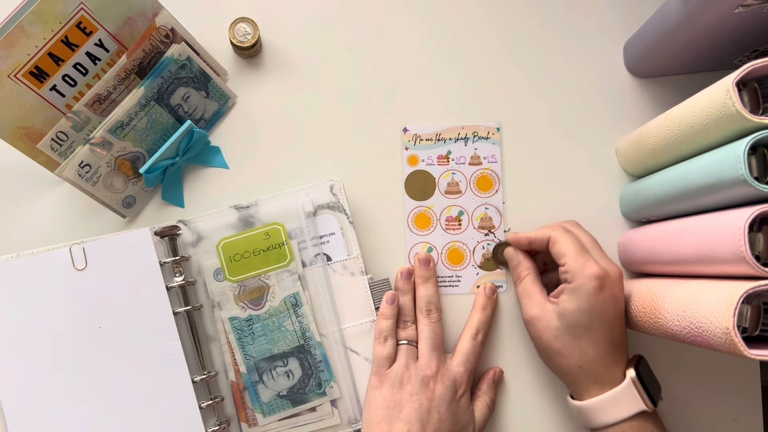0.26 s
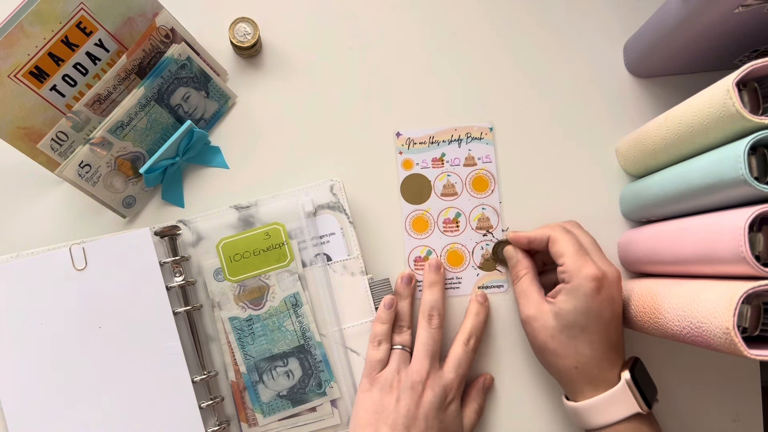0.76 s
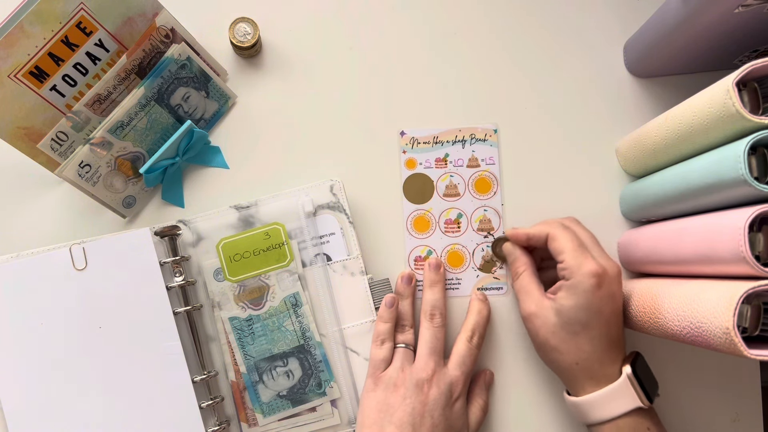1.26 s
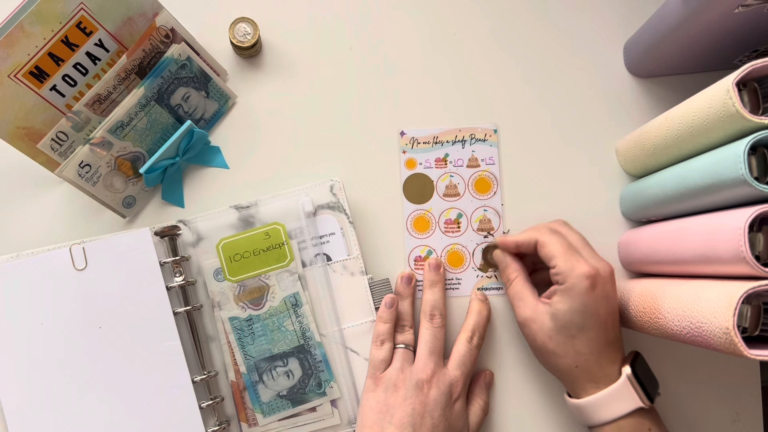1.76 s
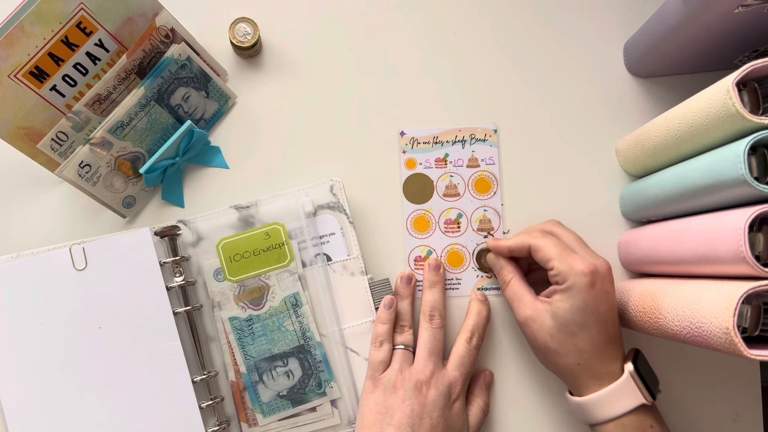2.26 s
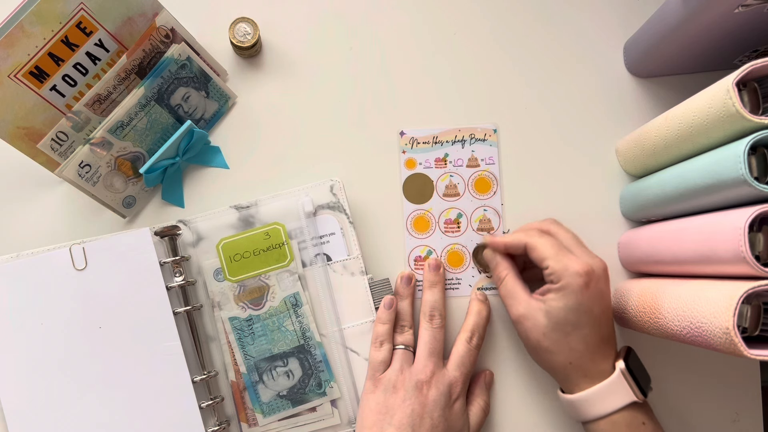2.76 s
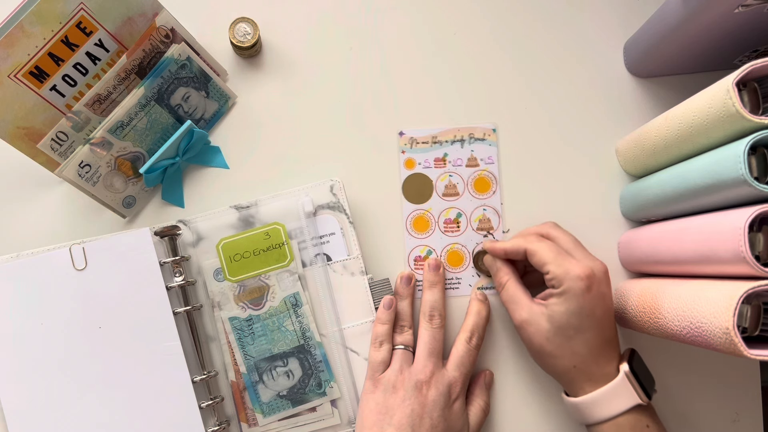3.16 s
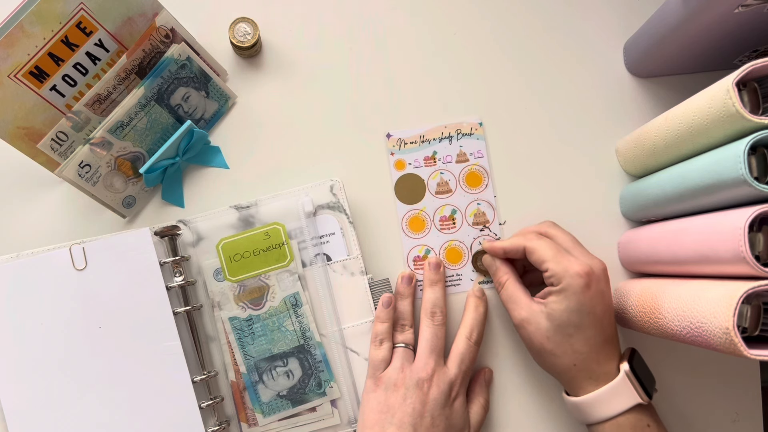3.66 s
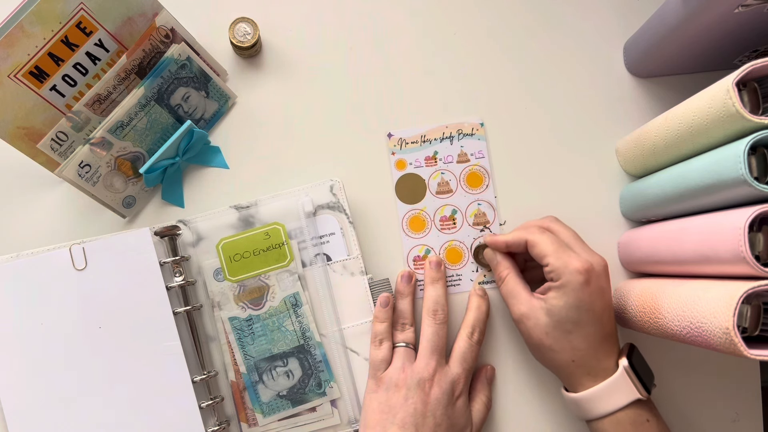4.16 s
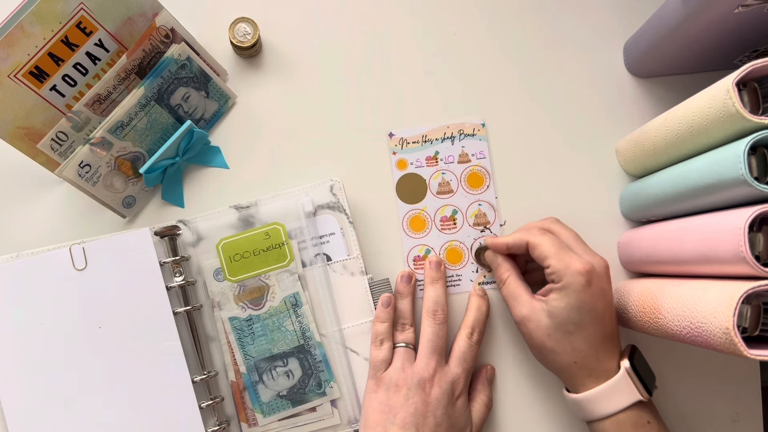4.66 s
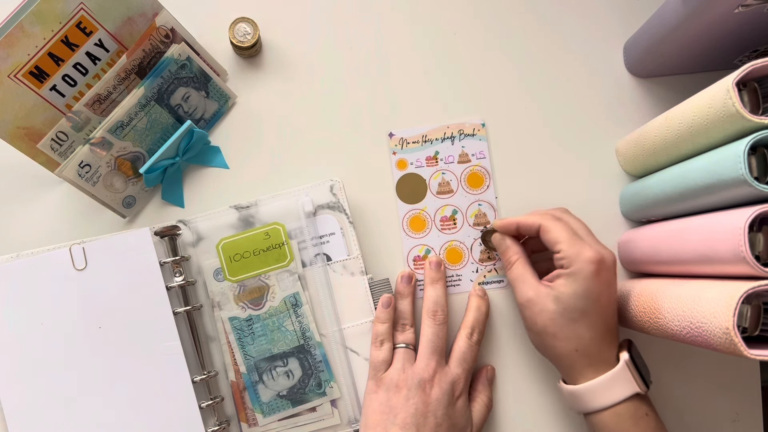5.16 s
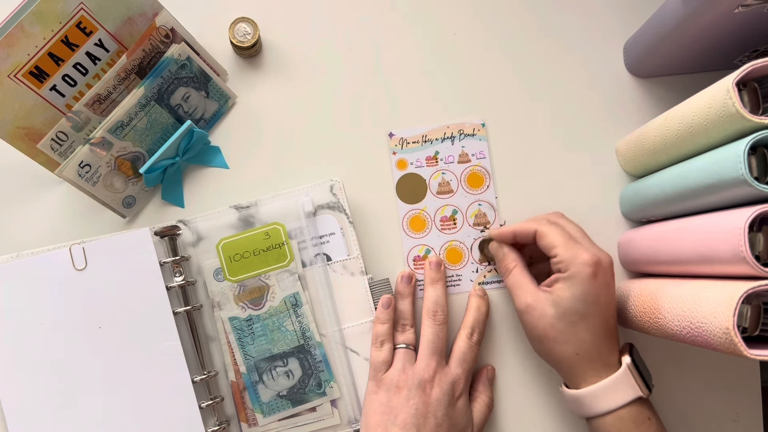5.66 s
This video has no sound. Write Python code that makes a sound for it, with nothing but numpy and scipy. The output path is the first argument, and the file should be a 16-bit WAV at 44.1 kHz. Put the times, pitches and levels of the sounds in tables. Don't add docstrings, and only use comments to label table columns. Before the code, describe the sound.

Rapid dry scratching of a coin on a coated card, steady at first, then uneven flicks and a few drumming corner sweeps.

```python
import sys
import numpy as np
from scipy import signal
from scipy.fft import rfft, irfft, next_fast_len
from scipy.io import wavfile
from scipy.ndimage import uniform_filter1d, map_coordinates

SR = 44100
rng = np.random.default_rng(int(sys.argv[2]) if len(sys.argv) > 2 else 0)


def digitize_waveform(pressure):
    field = np.atleast_2d(pressure).T
    bounded = np.clip(field, -1, 1)
    quanta = np.round(bounded * 32767).astype(np.int16)
    wavfile.write(sys.argv[1], SR, quanta)


def invert_db(level):
    return 10 ** (np.asarray(level, dtype=float) / 20)


N = 260983
TIME = np.arange(N) / SR


def unit(x):
    return x / np.sqrt(np.mean(x ** 2) + 1e-20)


def along(points, hz):
    f, v = np.transpose(points)
    return np.interp(np.log(hz + 1), np.log(f + 1), v)


def filtered(x, response):
    m = next_fast_len(N + SR // 2)
    return irfft(rfft(x, m) * response(np.fft.rfftfreq(m, 1 / SR)), m)[..., :N]


def mode(f, hz, width_hz):
    return 1j * f * width_hz / (hz * hz - f * f + 1j * f * width_hz)


def desk(f):
    # (frequency [Hz], width [Hz], signed gain left [1], signed gain right [1])
    desk_modes = [(402.1, 50.6, -2, -2), (419.6, 70, 1.4049, 1.62), (620, 131.6, 2, -0.09),
                  (670.5, 268, -1.5065, 0.5442), (775, 154.5, 0.05, -0.9), (894, 124, 0.6064, -0.1833),
                  (1099.6, 44.2, 1.14, 0.28), (1175, 59.7, 0.46, 0.66), (1454, 217, 0.46, -0.51),
                  (1442, 82, -0.72, 0.86), (1602, 166.7, -1.0865, -1.3043), (1631.3, 217, 0.4542, 1.0779),
                  (2185.6, 233, 0.07, 0.8066), (2204, 287, 0.1253, -0.6584), (2470, 230, -0.07, 0.0621),
                  (2710, 650, 0.0332, -0.0451)]
    modes = 0
    for hz, width_hz, left, right in desk_modes:
        modes = modes + np.array([[left], [right]]) * mode(f, hz, width_hz)
    return modes * f * f / (f * f - 385 ** 2 - 1j * f * 330)


def air(colour):
    # (frequency [Hz], lead [rad])
    lead_points = [(1500, 0), (2400, .8), (3300, .2), (5000, .3), (6100, -1.2), (6800, .3), (8100, -.1),
                   (9400, -3.1), (9900, -3.4), (11200, -6.3), (12300, -6.7), (12700, -9.1), (13800, -9.6),
                   (14600, -12.5)]

    def response(f):
        half_lead = np.interp(f, *np.transpose(lead_points)) / 2
        return invert_db(along(colour, f)) * np.exp(1j * np.array([half_lead, -half_lead]))

    return response


def all_strokes():
    # (top speed time [s], half length [ms], rub [dB], hiss re rub [dB], fizz re rub [dB])
    scrub = [(.047, 12.6, -50.5, -15.5, -50), (.156, 18.7, -46, -25, -61), (.245, 11.5, -60.5, -11.5, -20),
             (.345, 16.4, -46, -18.5, -36), (.446, 9.6, -50, -17, -52), (.527, 18.6, -53.5, -29, -55),
             (.618, 14, -69.5, -28, -8.5), (.668, 31.4, -59.5, -31, -13), (.818, 11.5, -46, -27.5, -34),
             (.941, 13.7, -47, -12.5, -69), (1.076, 20, -41, -28, -31), (1.19, 20, -52.5, -6, -22),
             (1.311, 20.6, -44.5, -26.5, -22), (1.42, 16, -50.5, -6.5, -19), (1.531, 20.4, -44.5, -24, -21),
             (1.635, 17.4, -48.5, -16.5, -16.5), (1.75, 21.1, -43, -25.5, -28),
             (1.873, 12.8, -46, -13, -33), (1.982, 20.3, -45.5, -25, -25.5), (2.098, 15.6, -51.5, -10, -24),
             (2.222, 16.9, -42, -28.5, -31.5), (2.331, 9, -42.5, -28.5, -36),
             (2.426, 16.2, -43, -24.5, -22.5)]
    # (top speed time [s], half length [ms], rub [dB], hiss re rub [dB],
    # fizz re rub [dB])
    flicks = [(2.52, 16.6, -62.5, -16, -20), (2.628, 19.2, -46, -40, -25.5), (2.737, 16, -59.5, -8, -12.5),
              (2.842, 21, -53, -35, -24), (2.944, 8.1, -51.5, -17.5, -27), (3.074, 24.4, -56.5, -17.5, -29),
              (3.145, 9.6, -51.5, -21.5, -26), (3.264, 19, -61.5, -28, -24), (3.366, 16, -55, -20, -20.5),
              (3.492, 12.3, -58, -37, -25), (3.583, 13.6, -77.5, 3.5, -17), (3.686, 4, -81.5, -7, -16.5),
              (3.93, 18, -65.5, -19, -47), (4.091, 30, -63.5, -40, -45), (4.148, 14.5, -50.5, -19.5, -46),
              (4.272, 15.7, -45.5, -44.5, -56), (4.373, 14, -58.5, -31.5, -31),
              (4.487, 16, -50.5, -35, -44.5), (4.553, 8.1, -48.5, -27.5, -38), (4.688, 33, -54, -44, -47),
              (4.734, 29, -66, -6, -18), (4.798, 17.5, -55, -49.5, -32), (4.872, 3.9, -62, -41, -24),
              (4.924, 15, -91.5, -5, 6)]
    # (top speed time [s], half length [ms], rub [dB], hiss re rub [dB], fizz re rub [dB])
    sweeps = [
        (5.221, 7.5, -62, -43, -22),
        (5.284, 19, -49.5, -41.5, -23.5),
        (5.444, 11, -88, 3, 5.5),
        (5.525, 18.7, -49.5, -24.5, -52),
        (5.57, 17, -96.5, 18, 26),
        (5.822, 34, -51.5, -21.5, -27),
    ]
    kinds = ((scrub, 0.035), (flicks, 0.35), (sweeps, 0.34))
    return [(*row, lean) for rows, lean in kinds for row in rows]


def bells():
    power = np.zeros((4, N))
    sharpness = np.array([[0.8], [1.2], [1.1], [1.1]])
    for s, half_ms, rub_db, hiss_db, fizz_db, lean in all_strokes():
        near = slice(max(round((s - 0.25) * SR), 0), round((s + 0.25) * SR))
        t = TIME[near] - s
        half_s = half_ms / 1000 * (1 + lean * np.sign(t))
        bell = np.exp(-0.5 * np.abs(t / half_s) ** 2.57)
        level_db = rub_db + np.array([[0], [0], [hiss_db], [fizz_db]])
        power[:, near] += bell ** sharpness * invert_db(2 * level_db)
    return power


def grit(rate_hz, spread_db, smooth):
    bunch = map_coordinates(rng.standard_normal(N // 128 + 4), [np.arange(N) / 128])
    sizes = invert_db(spread_db * np.minimum(rng.exponential(size=N), 2.5))
    slips = (rng.random(N) < rate_hz / SR) * rng.standard_normal(N) * sizes
    return unit(slips) * invert_db(2.2 * bunch) + smooth * rng.standard_normal(N)


def patchy(x, patchy_db):
    z = signal.stft(x, nperseg=256)[2]
    field = uniform_filter1d(rng.standard_normal(z.shape), size=3, axis=-2)
    field = uniform_filter1d(field, size=7, axis=-1)
    return signal.istft(z * invert_db(patchy_db * unit(field)), nperseg=256)[1][..., :N]


def strokes():
    # (time [s], upper over lower hiss [dB])
    coating = [(0, -2.5), (.45, -2.5), (.56, -14), (.7, -2.5), (2.1, -3), (2.38, -8), (2.8, -4.5),
               (3.5, -11), (4.3, -15.5), (4.75, -7.5), (4.9, -3), (5.92, -2.5)]
    # (frequency [Hz], density [dB per Hz])
    scuff_colour = [(1500, -25.5), (2500, 2), (3300, 3), (4100, 2), (5000, -7.5), (6200, -23),
                    (7000, -41.5)]
    hiss_colour = [(4600, -28), (5300, -7.5), (6100, 7.5), (6800, -1.5), (7600, -1.5), (9200, -19.5),
                   (9900, -59.5)]
    fizz_colour = [(9000, 1), (9800, 5), (10500, 4), (12000, -5), (12800, -10.5), (14500, 1.5), (15700, -3),
                   (16000, -32)]
    dull, sharp, hiss, fizz = np.sqrt(bells())

    s, _, _, hiss_db, *_ = np.transpose(all_strokes())
    steep_db = 6.5 + 0.7 * hiss_db - 0.46 * np.interp(s, *np.transpose(coating))
    bite_db = np.interp(TIME, s, np.clip(steep_db, -31, 1.5))
    upper_db = np.interp(TIME, *np.transpose(coating))

    coarse = grit(1600, 3, smooth=0.5)
    fine = grit(2000, 3.5, smooth=0.5)
    push = filtered(patchy(coarse, 2.4), lambda f: (1 - 0.27 * mode(f, 408, 120)) / (1 + 1j * f / 900) ** 3)
    bite = filtered(patchy(fine, 2.2), lambda f: (1j * f / (900 + 1j * f)) ** 2)
    push = push / np.std(filtered(push, desk))
    bite = bite / np.std(filtered(bite, desk))
    dull_force = dull * invert_db(-3.5 - 0.17 * bite_db) * push
    sharp_force = sharp * invert_db(3.5 + 0.96 * bite_db) * bite
    body = filtered(dull_force + sharp_force, desk)

    tear = patchy(grit(3000, 2.8, smooth=0.76), 3.3)
    scuff = unit(filtered(tear, air(scuff_colour)))
    upper = unit(filtered(tear, air(hiss_colour)))
    top = unit(filtered(tear, air(fizz_colour)))
    torn = hiss * (invert_db(-5.0 - 0.61 * upper_db) * scuff + invert_db(-2.3 + 1.8 * upper_db) * upper)
    return body, torn + fizz * invert_db(1.0) * top


def contacts():
    # (time [s], peak [dB], click re peak [dB], contact [ms])
    catches = [(.615, -22.5, -40, 0.87), (.894, -33, -40, 0.98), (.927, -44, -38, 1),
               (1.105, -26, -25, 0.78), (1.173, -30, -29, 0.057), (1.271, -22, -39, 0.88),
               (1.552, -15.5, -33, 1), (1.615, -30.5, -30, 0.36), (1.834, -44.5, -8, 0.32),
               (2.201, -20.5, -40, .99), (2.639, -19, -25.5, 0.37), (2.73, -24, -24, 0.24),
               (2.824, -41, -20.5, 0.78), (2.864, -17.5, -32.5, 0.78), (2.94, -32.5, -38, 0.35),
               (3.027, -38, -44, .95), (3.364, -26.5, -24, 0.17), (3.568, -38, -17.5, 1),
               (3.599, -26, -35, 1), (3.932, -29, -33, 0.56), (4.132, -25.5, -44, 0.51),
               (4.303, -17.5, -37.5, 0.42), (4.411, -40.5, -35, .16), (4.487, -16, -35, 0.67),
               (4.556, -32.5, -33, 0.097), (4.665, -18.5, -34.5, 0.59), (4.721, -29.5, -22.5, 0.7),
               (4.762, -49, -8, .54), (5.277, -26.5, -21.5, 0.62), (5.552, -20.5, -12, 0.41)]
    # (time [s], peak [dB], click re peak [dB], contact [ms], card spring [dB])
    landings = [(.131, -27, -27, .99, 7), (.692, -38.5, -16.5, 0.63, 3), (1.201, -19.5, -25, 0.38, 7.5),
                (2.628, -19, -28.5, 0.95, 5), (3.066, -11.5, -32, 0.55, 7.5),
                (3.143, -21, -38.5, 0.15, 6.5), (3.353, -45.5, -17.5, .15, 11),
                (3.684, -63, -11.5, .4, 6.5), (3.939, -26, -40, 1, 3.5), (4.049, -29.5, -34, 0.36, 12),
                (4.166, -32, -18.5, 0.096, -0.5), (5.215, -37, -21, 1, 7), (5.507, -12.5, -25, 0.28, 11),
                (5.781, -13, -23.5, 0.22, 14.5)]
    flat_card_db = -12
    rows = sorted([(*row, flat_card_db) for row in catches] + landings)
    return [(*row, -19.5 - 18.5 * row[3]) for row in rows]


def taps():
    # (frequency [Hz], density [dB per Hz])
    click_colour = [(2000, -48.5), (3200, -4), (5000, -13), (7500, -11), (9000, -13.5), (11000, -15),
                    (13000, -14.5), (15500, -13.5), (16000, -35.5)]
    force, spring, crack = np.zeros((3, N + SR))
    t = np.arange(SR // 40) / SR
    hits = contacts()
    noises = rng.standard_normal((len(hits), 2, len(t)))
    for (s, db, click_db, contact_ms, card_db, skid_db), (skid_noise, crack_noise) in zip(hits, noises):
        here = slice(round(s * SR), round(s * SR) + len(t))
        u = t / (max(contact_ms, 0.05) / 4000)
        push = u * np.exp(-u) / np.sum(u * np.exp(-u))
        skid = invert_db(skid_db - 60 * t / 0.032) * skid_noise
        force[here] += invert_db(db + 29) * (push + skid)
        spring[here] += invert_db(db + 17.5 + card_db) * push
        dull = np.clip(-0.02 * (click_db + 8.5), 0, 0.8)
        dulled = signal.lfilter([1 - dull], [1, -dull], crack_noise)
        crack[here] += invert_db(db + click_db + 6.0 - 60 * t / 0.028) * dulled
    knock = filtered(force[:N], lambda f: desk(f) * (1 - 0.22 * mode(f, 407, 120)))
    knock = knock + filtered(spring[:N], lambda f: desk(f) * mode(f, 647, 180))
    return knock, filtered(crack[:N], air(click_colour))


def corner(x):
    late = TIME > 5.1

    def drum(f):
        low = -0.23 * mode(f, 376, 182) + 0.45 * mode(f, 610, 300)
        high = -0.5 * mode(f, 1520, 710) + 0.35 * mode(f, 2500, 400)
        return 1 + low + high

    return x * ~late + filtered(x * late, drum)


def thumps():
    # (time [s], peak [dB], frequency [Hz], t60 [s])
    drops = [(0.148, -42, 120.7, 0.23), (0.698, -36.5, 118, 0.19), (1.108, -56, 131, 0.12),
             (1.556, -41, 138.5, 0.28), (2.205, -38.5, 139, 0.1), (2.447, -55, 118, 0.39),
             (2.646, -31, 127.6, 0.17), (2.736, -31, 130, 0.14), (2.865, -42.5, 133.6, 0.41),
             (3.068, -46, 130.3, 0.34), (3.37, -39.5, 119, 0.22), (4.144, -33.5, 121, 0.12),
             (4.308, -60, 174, 0.19), (4.49, -47, 131, 0.51), (4.7, -49, 127, 0.54),
             (5.513, -47, 118, 0.41), (5.783, -51.5, 181, 0.18), (.38, -49, 58.4, .3), (.64, -51.5, 56, .3),
             (1.21, -48, 60.4, 0.41), (2.21, -43.5, 58, 0.28), (3.231, -45, 128, 0.23),
             (3.6, -53.5, 136, 0.13), (3.93, -52, 128, 0.14), (4.049, -47, 130, 0.26),
             (4.666, -43, 141, 0.16), (5.041, -56, 68.8, 0.34)]
    out = np.zeros(N + SR)
    t = np.arange(SR // 2) / SR
    for s, db, hz, t60_s in drops:
        ring = invert_db(db - 60 * t / t60_s) * np.sin(2 * np.pi * hz * t)
        out[round(s * SR):][:len(t)] += ring * (1 - np.exp(-t / 0.017))
    return out[:N]


def arm():
    # (frequency [Hz], width [Hz], gain [dB])
    boom_modes = [(118, 2.6, -3), (131.2, 25, -3), (177, 16, -6.5), (259, 79, -11.5)]
    # (frequency [Hz], width [Hz], gain [dB])
    sway_modes = [(50, 10, -0.5), (59, 15, 1.5), (72, 3.5, -8)]
    # (time [s], weight [dB])
    weight = [(0.0, -45), (0.05, -63.5), (0.23, -57.5), (0.3, -68), (0.43, -59.5), (0.64, -69.5),
              (1.35, -56), (1.38, -63), (2.29, -63.5), (2.31, -74), (2.47, -54), (3.21, -54), (3.23, -63),
              (4.14, -63), (4.19, -55), (4.25, -57.5), (5.62, -73.5), (5.92, -66)]
    settle_s, rest_db, knock_share_db = 0.03, -91.5, -24.5
    weight_db = np.interp(TIME, *np.transpose(weight))
    keep = np.exp(-1 / (settle_s * SR))
    effort = bells()[0]
    for s, db, *_ in contacts():
        effort[round(s * SR)] += invert_db(2 * (db + knock_share_db)) * settle_s * SR
    effort_db = 10 * np.log10(signal.lfilter([1 - keep], [1, -keep], effort) + invert_db(2 * rest_db))
    boom_db = -59 + 0.69 * (effort_db + 48.5) + 0.45 * (weight_db + 60.5)

    def shaken(db, modes, apart):
        def shape(f):
            ringing = sum(invert_db(gain_db) * mode(f, hz, width_hz) for hz, width_hz, gain_db in modes)
            return ringing * mode(f, modes[1][0], 94) * (f / (f + 1j * 45)) ** 2

        mid, side = unit(filtered(rng.standard_normal((2, N)), shape))
        return invert_db(db) * np.array([mid + apart * side, mid - apart * side])

    out = shaken(boom_db, boom_modes, apart=0.3) + shaken(weight_db - 0.6, sway_modes, apart=0.07)
    return out * invert_db([[-0.4], [0.4]])


def room(x, apart):
    # (frequency [Hz], t60 [s])
    decay = [(200, 0.73), (600, 0.18), (1600, 0.3), (2400, 0.33), (4000, 0.27), (10000, 0.093)]
    hz, t, z = signal.stft(rng.standard_normal((2, SR // 2)), SR, nperseg=256)
    fade = invert_db(-60 * t / along(decay, hz)[:, None])
    mid, side = signal.istft(z * fade, SR, nperseg=256)[1]
    tail = np.array([mid + apart * side, mid - apart * side])
    delayed = np.pad(x, ((0, 0), (250, 0)))
    return signal.fftconvolve(delayed, tail / np.linalg.norm(tail[0]), axes=1)[:, :N]


def whistle():
    hz, sag_hz_per_s, fuzz_hz, half_s = 3990, 700, 90, 0.06
    t = TIME - 3.78
    fuzz = unit(filtered(rng.standard_normal(N), lambda f: 1 / (1 + (f / fuzz_hz) ** 2)))
    turns = hz * t - sag_hz_per_s * t * t / 2
    swell = invert_db(-93) * np.exp(-0.5 * (t / half_s) ** 2)
    return swell * (1 + fuzz) * np.sin(2 * np.pi * turns)


def hush():
    # (frequency [Hz], density [dB per Hz])
    floor = [(120, -26), (200, 3.5), (620, -6.5), (950, -12), (1500, -13.5), (2400, -18.5), (4000, -22.5),
             (6200, -24.5), (9000, -25), (12500, -27), (14000, -38), (16000, -52.5)]
    shared = unit(filtered(rng.standard_normal(N), air(floor)))
    own = unit(filtered(rng.standard_normal((2, N)), lambda f: invert_db(along(floor, f))))
    return invert_db(-78.5) * (shared + 0.092 * own)


def scene():
    rub, hiss = strokes()
    knock, click = taps()
    rub = corner(patchy(rub, 2.6))
    knock = corner(knock)
    wood_send = patchy(invert_db(-10.5) * rub + invert_db(-11.5) * knock, 3.0)
    wood = rub + knock + patchy(room(wood_send, apart=0.63), 1.65)
    bright = hiss + click + room(invert_db(-9.5) * hiss + invert_db(-12.5) * click, apart=0.77)
    return wood + bright + arm() + thumps() + hush() + whistle()


def low_pass(x):
    return signal.sosfilt(signal.butter(12, 16520, fs=SR, output="sos"), x)


def record(dry):
    def dips(f):
        return (f < 16500) * (1 - 0.34 * mode(f, 9600, 900)) * (1 - 0.5 * mode(f, 13300, 900))

    mix = filtered(dry, dips)
    return low_pass(mix)


dry = scene()
out = record(dry)
digitize_waveform(out)
```